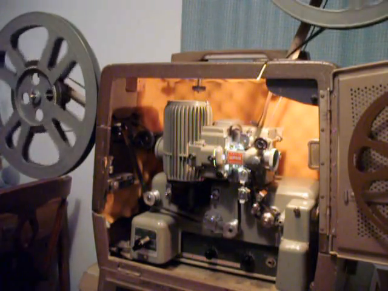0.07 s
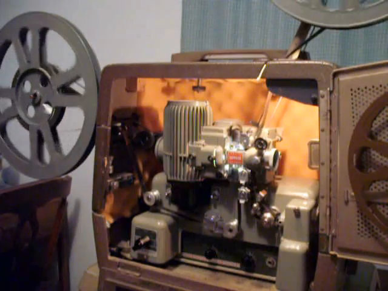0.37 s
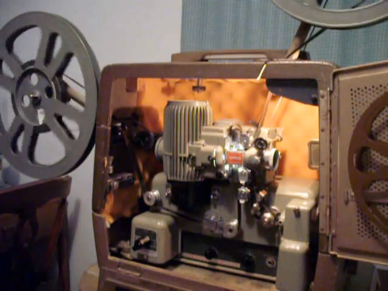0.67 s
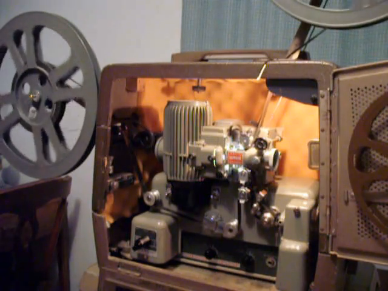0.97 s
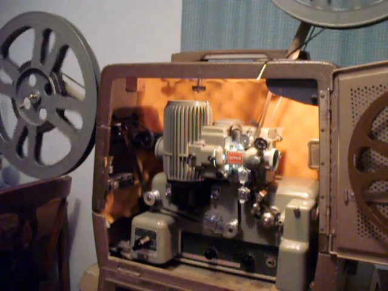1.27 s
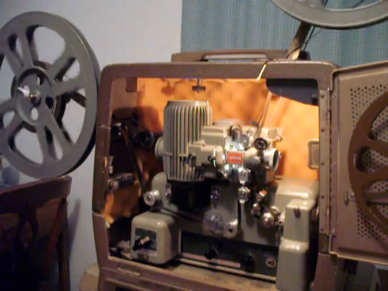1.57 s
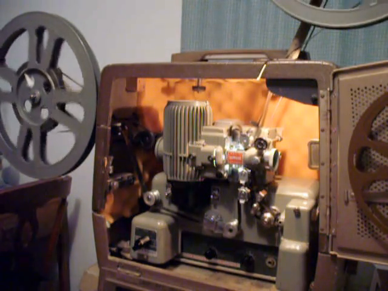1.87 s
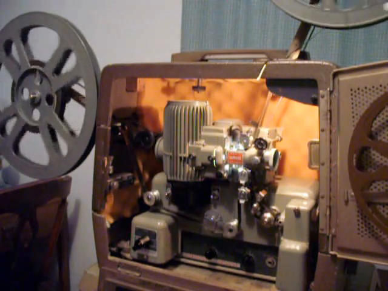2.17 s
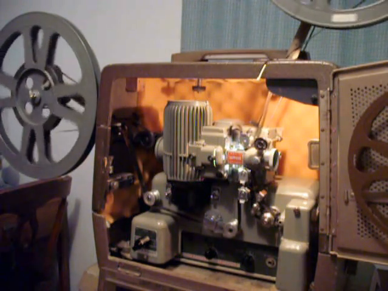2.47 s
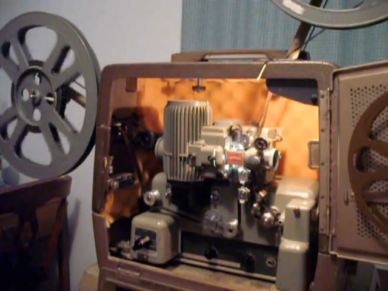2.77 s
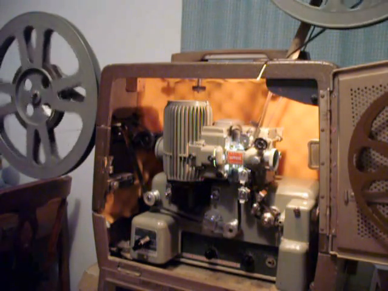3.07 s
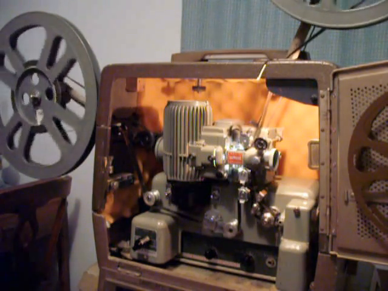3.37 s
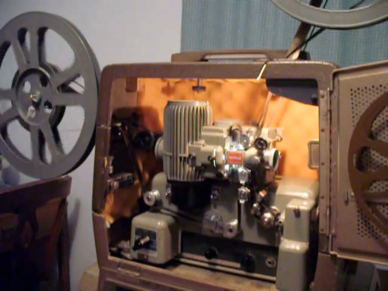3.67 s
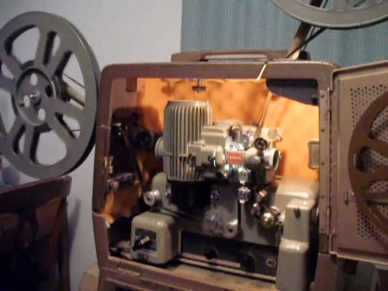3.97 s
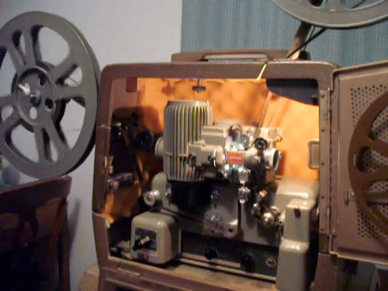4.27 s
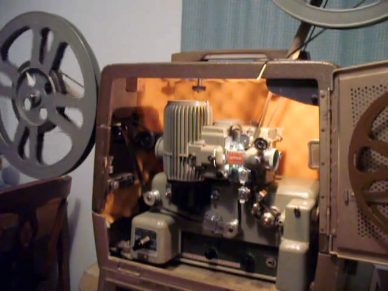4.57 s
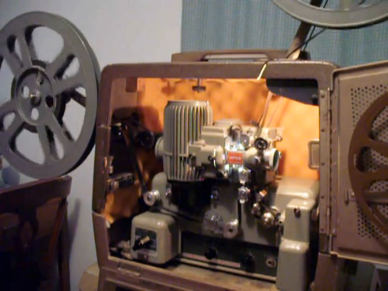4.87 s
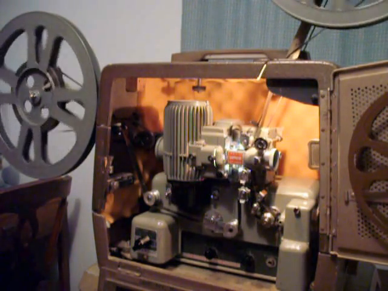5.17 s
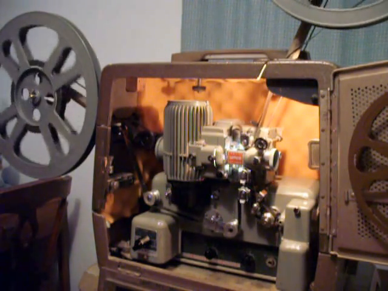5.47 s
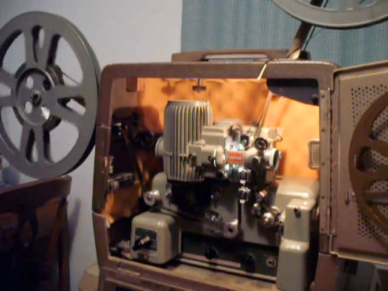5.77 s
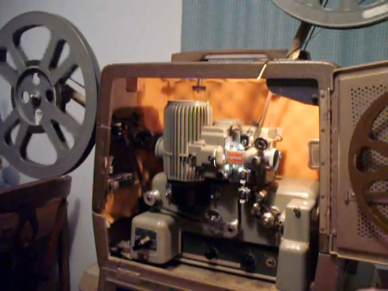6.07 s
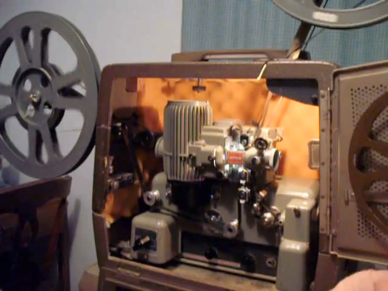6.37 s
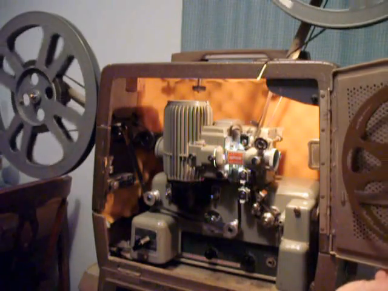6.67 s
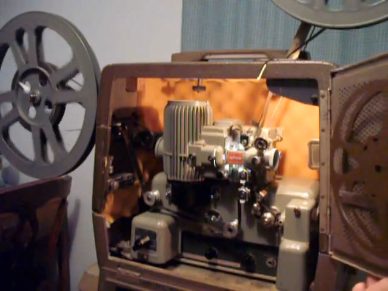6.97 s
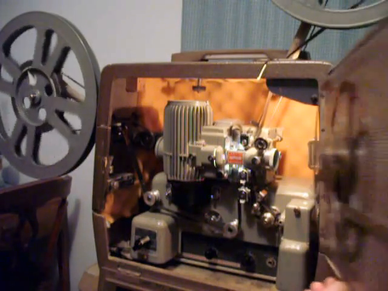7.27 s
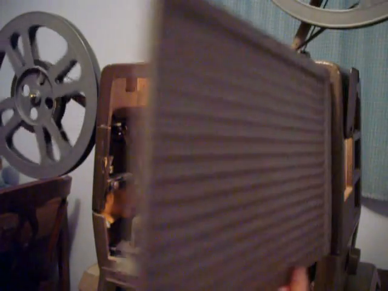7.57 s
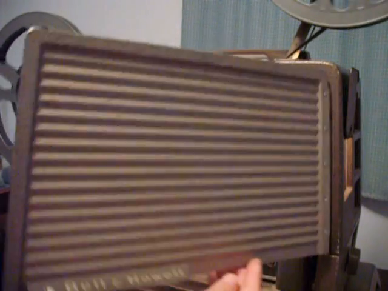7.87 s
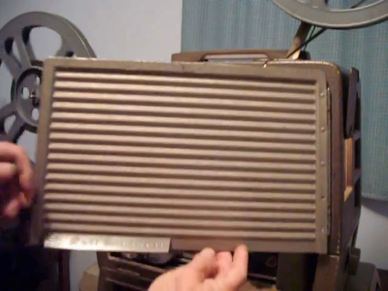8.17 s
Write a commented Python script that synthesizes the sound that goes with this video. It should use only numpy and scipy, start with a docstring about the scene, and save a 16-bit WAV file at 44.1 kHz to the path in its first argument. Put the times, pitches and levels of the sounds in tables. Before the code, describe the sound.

Steady fan rush, gear whine and fine clatter from a film projector, broken by a brief rasping screech and slightly muffled near the end.

```python
"""A small room with a film projector running: its fan rushes, motor and gears whine, and teeth, claw
and film rattle in the case; the whine changes colour as the load shifts. Something in the film path
binds and gives a loud, rasping squeal that drives the recorder into its limiter. A few dull bumps
follow. Near the end the side door swings shut, first throwing the noise forward, then screening
its treble."""
import sys
import numpy as np
from scipy import signal
from scipy.fft import rfft, irfft, next_fast_len
from scipy.io import wavfile

SR = 44100
rng = np.random.default_rng(int(sys.argv[2]) if len(sys.argv) > 2 else 0)


def generate_wav(signal):
    """Clip the signal to [-1, 1] and save it as 16-bit WAV at the path in sys.argv[1]."""
    frames = np.transpose(np.atleast_2d(signal))
    scaled = np.clip(frames, -1, 1) * 32767
    pcm = np.round(scaled).astype(np.int16)
    wavfile.write(sys.argv[1], SR, pcm)


N = 362943


def from_db(db):
    """Decibels to gain."""
    return np.exp(np.asarray(db) * (np.log(10) / 20))


def rms_one(x):
    """Scale to unit power."""
    return x / np.sqrt(np.mean(x ** 2) + 1e-20)


def near(value, centre, width):
    """Bell curve, 1 at the centre."""
    return np.exp(-((value - centre) / width) ** 2)


def past(angle, edge, softness):
    """0 to 1 as the angle closes past an edge."""
    return 1 / (1 + np.exp((angle - edge) / softness))


def drift(rate_hz):
    """Smooth random wander, rms about 1."""
    pole = np.exp(-40 * np.pi * rate_hz / SR)  # runs at SR / 20
    slow = signal.lfilter([1], [1, -2 * pole, pole * pole], rng.standard_normal(N // 20 + 4002))[4000:]
    return np.interp(np.arange(N) / 20, np.arange(len(slow)), rms_one(slow))


def resonance(x, hz, q):
    """Band picked out by one mode."""
    return signal.lfilter(*signal.iirpeak(hz, q, fs=SR), x)


def treble(x, hz):
    """Zero-phase high-pass."""
    return signal.sosfiltfilt(signal.butter(3, hz, "high", fs=SR, output="sos"), x)


def coloured(x, spectrum, resonances=()):
    """Broad colour plus resonant peaks and dips; rms 1."""
    size = next_fast_len(N)
    hz = np.maximum(np.arange(size // 2 + 1) * SR / size, 1)
    points_hz, levels_db = np.transpose(spectrum)
    db = np.interp(np.log(hz), np.log(points_hz), levels_db)
    for centre_hz, width_hz, lift_db in resonances:
        db = db + lift_db / (1 + (2 * (hz - centre_hz) / width_hz) ** 2)
    return rms_one(irfft(rfft(x, size) * from_db(db), size)[:N])


def shaft(hz, wow):
    """Turns made by a shaft whose speed wanders."""
    return np.cumsum(hz * (1 + wow * drift(1.5))) / SR


def rattle(turns, spread_db, per_turn):
    """Teeth and claw touch at the same places every turn, with slightly varying force."""
    places, force = rng.random(per_turn), rng.standard_normal(per_turn)
    contact_turns = np.arange(int(turns[-1]) + 1)[:, None] + places
    contact_samples = np.searchsorted(turns, contact_turns).ravel()
    sizes = force * from_db(spread_db * rng.standard_normal(contact_turns.shape))
    return rms_one(np.bincount(contact_samples, sizes.ravel(), N + 1)[:N])


def whine(turns, orders, waver_db, waver_hz):
    """Whole harmonics of a shaft; each wavers and changes level as the load shifts."""
    shift_mid_s, shift_length_s = 3.8, .4
    shifted = np.clip((np.arange(N) / SR - shift_mid_s) / shift_length_s + .5, 0, 1)
    out = np.zeros(N)
    for order, before_db, after_db in orders:
        db = before_db + (after_db - before_db) * shifted + waver_db * drift(waver_hz)
        out += np.sqrt(2) * from_db(db) * np.sin(2 * np.pi * (round(order) * turns + rng.random()))
    return out


def projector():
    """Fan air and rattle throb with the strokes and ring in the case; gears, rotor and mains add tones."""
    # throbbing parts (3 per turn is the frame rate): strokes_per_turn, depth
    strokes = [(3, .02), (6, .02), (7, .035), (12, .018), (15, .018)]
    # colour of air and rattle: freq_hz, level_db
    rush_spectrum = [(25, -12.5), (65, -36), (100, -24), (130, -19.5), (260, -16.5), (330, -9.5),
                     (420, -11.5), (800, -7.5), (1100, -6.5), (1350, -4.5), (1850, -5.5), (2200, -1),
                     (3200, -1.5), (4500, -5.5), (5330, -8), (5550, -18), (5750, -22.5), (6200, -55.5)]
    # case and film path resonances: centre_hz, width_hz, lift_db
    case_modes = [(476.7, 60, 9.5), (943, 35, 3), (1310, 85, 3.5), (1586, 100, 5), (1920, 45, -1.5),
                  (2386, 23, 5.5), (2590, 63, -2), (3230, 55, -2), (3500, 70, 3), (3768, 250, 6.5),
                  (4545, 120, -4.5)]
    # thin rings of small metal parts: centre_hz, width_hz, lift_db
    metal_rings = [(2732, 20, 4.5), (2860, 10, 4), (4845, 50, 6.5), (5217, 18, 7)]
    # gear train tones around the load shift: shaft_order, before_db, after_db
    gear_orders = [(9, -68, -70.5), (24, -65, -63), (26, -67.5, -62), (27, -55.5, -56.5), (33, -71, -68),
                   (38, -68, -69.5), (40, -58, -61), (45, -53.5, -52.5), (48, -59, -62.5), (59, -56.5, -58),
                   (72.44, -54.5, -59), (80.8, -49, -55), (117, -49, -59), (127.2, -52, -56),
                   (147.8, -60, -53), (153.1, -53, -49), (159.7, -52, -50), (163.6, -49, -58),
                   (171.1, -47, -48), (181, -54, -52), (190.7, -52.5, -48), (196.4, -55.5, -53),
                   (200.4, -50, -50), (204.6, -50, -55)]
    # motor and fan tones: rotor_order, before_db, after_db
    motor_orders = [(1, -56.5, -56), (6, -49.5, -53.5), (7, -58, -58), (8, -58.5, -55), (9, -52, -54.5),
                    (11, -53, -58), (13, -51.5, -54), (15, -57.5, -55)]
    gear_hz, rotor_hz, mains_hz = 7.944, 86.95, 60
    gear, rotor = shaft(gear_hz, wow=.0013), shaft(rotor_hz, wow=.001104)
    throb = 1 + sum(depth * np.cos(2 * np.pi * (count * gear + rng.random())) for count, depth in strokes)
    air = rng.standard_normal(N)
    fine_rattle = from_db(-7.5) * rattle(gear, spread_db=1, per_turn=700)
    clatter = from_db(-12.5) * rattle(gear, spread_db=.7, per_turn=24)
    excitation = (air + fine_rattle + clatter) * throb * from_db(.083 * drift(1.2))
    rush = from_db(-26) * coloured(excitation, rush_spectrum, case_modes + metal_rings)
    gear_tones = whine(gear, gear_orders, waver_db=2.5, waver_hz=2)
    rotor_tones = whine(rotor, motor_orders[1:], waver_db=1.5, waver_hz=.94)
    imbalance = whine(rotor, motor_orders[:1], waver_db=.5, waver_hz=2)
    hum = from_db(-60) * np.sin(2 * np.pi * 2 * mains_hz * np.arange(N) / SR)
    return rush + gear_tones + rotor_tones + imbalance + hum


def friction():
    """Each rub bites, holds and lets go; the strongest sets roughness and pitch."""
    # film path rubs: start_s, length_s, attack_s, level_db, rough_start, rough_end, pitch_hz
    rubs = [(0.898, 0.16, .06, -35, 0.93, 0.92, 2300), (2.488, .014, .002, -25.5, .45, .45, 2330),
            (2.502, .012, .0015, -13, .36, .6, 2330), (2.521, .014, .005, -11, .4, .58, 2325),
            (2.539, .012, .002, -14, .55, .7, 2240), (2.555, .009, .002, -15.2, .7, .7, 2230),
            (2.57, .006, .003, -13.3, .6, .7, 2310), (2.581, .005, .002, -13.6, .65, .7, 2300),
            (2.591, .016, .002, -13, .72, .7, 2250), (2.622, .05, .014, -13.4, .86, .86, 2260),
            (2.673, .024, .003, -10.4, .66, .86, 2340), (2.708, .022, .004, -10.6, .66, .76, 2300),
            (2.735, .02, .002, -12.4, .62, .55, 2330), (2.777, .1, .02, -29.5, .75, .75, 2480),
            (2.955, 0.087, 0.028, -31.5, 0.8, .85, 2330)]
    bite_db, bite_s, break_up_s, release_db_per_s = 3.5, .014, .049, 385
    strength, rough, pitch_hz = np.zeros((3, N))
    for start_s, length_s, attack_s, level_db, rough_start, rough_end, hz in rubs:
        age_s = np.clip(np.arange(N) / SR - start_s, 0, 1)
        held_db = level_db + bite_db * np.exp(-age_s / bite_s)
        fall_db = release_db_per_s * np.maximum(age_s - length_s, 0)
        grip = np.minimum(age_s / attack_s, 1) * from_db(held_db - fall_db)
        leads = grip > strength
        rough = np.where(leads, np.interp(age_s, [0, break_up_s], [rough_start, rough_end]), rough)
        pitch_hz = np.where(leads, hz, pitch_hz)
        strength = np.maximum(strength, grip)
    return strength, np.clip(rough, 0, 1), pitch_hz


def squeal():
    """Stick-slip: roughness trades a clean tone for a rasp; narrow pitches ring on in the room."""
    # colour of the rasp: freq_hz, level_db
    rasp_spectrum = [(60, -50), (150, -36), (500, -23.5), (1000, -16.5), (1350, -9.5), (1750, -5),
                     (2000, -3.5), (2200, -5.5), (2480, -4), (2700, -8.5), (3100, -12.5), (3850, -10.5),
                     (4400, -23), (5400, -41.5)]
    # narrow pitches that ring on briefly in the room after the rasp: pitch_hz, gain_db
    room_rings = [(1728, 7), (2105, 8), (2223, 9), (2321, 6), (2486, 11.5)]
    strength, rough, held_hz = friction()
    pitch_hz = held_hz * (1 - .012 * rough + .04 * rough * drift(137))
    tone = np.sqrt(2) * np.sin(2 * np.pi * np.cumsum(pitch_hz) / SR)
    tone *= from_db(1.4 * rough * drift(120)) * strength * np.sqrt(1 - rough ** 2)
    scrape = rng.standard_normal(N) * from_db(drift(120))
    rasp = strength * rough * from_db(-1.44) * coloured(scrape, rasp_spectrum)
    ringing = sum(from_db(db) * resonance(rasp, hz, q=480) for hz, db in room_rings)
    reverb = room(from_db(-11) * tone + from_db(-.2) * rasp, t60_s=.63)
    return tone + rasp + ringing + reverb


def room(x, t60_s):
    """Dense decaying reflections after the nearest wall's delay; unit power gain."""
    t = np.arange(int(.8 * SR)) / SR
    tail = rng.standard_normal(len(t)) * from_db(-60 * t / t60_s) * (t > .006)
    return signal.fftconvolve(x, tail / np.linalg.norm(tail))[:N]


def bumps():
    """Each row rings one damped mode; the first three rows together are a single knock that rings three modes."""
    # bumps on case and microphone: start_s, peak_db, pitch_hz, t60_s
    hits = [(3.018, -29.5, 359, 0.13), (3.025, -36.5, 287, 0.24), (3.031, -37.5, 170, 0.12),
            (3.79, -47, 150, .15), (5.79, -36, 24.2, 0.5), (7.976, -33, 460, 0.12), (8.155, -27, 1560, .08)]
    out = np.zeros(N)
    for start_s, peak_db, pitch_hz, t60_s in hits:
        age_s = np.clip(np.arange(N) / SR - start_s, 0, 2)
        out += from_db(peak_db - 60 * age_s / t60_s) * np.sin(2 * np.pi * pitch_hz * age_s)
    return out


def swells(x):
    """Narrow bands of the running noise rise or recede for a while."""
    # slow colour shifts: peak_s, spread_s, centre_hz, q, lift_db
    bands = [(4.95, .3, 590, 14, 5), (5.4, 0.44, 680, 14, 5.5), (5.3, 0.41, 455, 8, -6),
             (5.85, .3, 330, 8, 4.5), (6.9, 1, 660, 11, -3), (6.55, .7, 4870, 45, 3)]
    t = np.arange(N) / SR
    for peak_s, spread_s, centre_hz, q, lift_db in bands:
        x = x + (from_db(lift_db * near(t, peak_s, spread_s)) - 1) * resonance(x, centre_hz, q)
    return x


def door(x):
    """The closing door passes its resonances, mirrors the noise, shades the treble and nearly seals."""
    # side door opening: time_s, angle_deg
    swing = [(6.1, 170), (6.4, 170), (6.75, 147), (7.0, 140), (7.25, 105.6), (7.5, 94), (7.75, 49),
             (8.0, 18), (8.23, 12)]
    # panel and gap resonances: freq_hz, q, centre_deg, spread_deg, lift_db
    modes = [(87, 7.6, 120, 56, 2), (1000, 9, 122, 20, 4), (1430, 3.5, 136, 30, 1.8),
             (1570, 7, 82, 12, 4.5), (1760, 20, 114, 14, 4.5), (2380, 18, 130, 10, 0.5),
             (2600, 3, 90, 9, -1), (4100, 14, 117, 8, 1.5), (4500, 30, 130, 15, 3.5)]
    angle_deg = np.interp(np.arange(N) / SR, *np.transpose(swing))
    for hz, q, centre_deg, spread_deg, lift_db in modes:
        x = x + (from_db(lift_db * near(angle_deg, centre_deg, spread_deg)) - 1) * resonance(x, hz, q)
    mirror_db = 1.7 * near(angle_deg, centre=116, width=12)  # inner face reflects at the microphone
    shade_db = -2.9 * past(angle_deg, edge=98, softness=2.5)  # panel hides the mechanism
    seal_db = -2 * past(angle_deg, edge=48, softness=8.3)  # narrow gap holds in the mids too
    x = x + (from_db(mirror_db + seal_db) - 1) * treble(x, hz=760)
    return x + (from_db(shade_db) - 1) * treble(x, hz=1700)


def scene():
    """One microphone in front of the case, the same in both channels."""
    return np.tile(door(swells(projector())) + squeal() + bumps(), (2, 1))


def limiter(x, ceiling, recover_db_per_s):
    """Gain ducks instantly under peaks above the ceiling, then recovers."""
    over_db = 20 * np.log10(np.maximum(np.abs(x) / ceiling, 1))
    recovered_db = recover_db_per_s * np.arange(N) / SR
    return x * from_db(recovered_db - np.maximum.accumulate(over_db + recovered_db, axis=-1))


def record(dry):
    """Narrow-band recorder whose abrupt limiter crackles on the loudest peaks."""
    recorder_stop_hz, output_stop_hz = 6000, 16600
    narrow = signal.sosfilt(signal.cheby2(26, 70, recorder_stop_hz, fs=SR, output="sos"), dry)
    limited = limiter(narrow, ceiling=.71, recover_db_per_s=420)
    return signal.sosfilt(signal.cheby2(12, 70, output_stop_hz, fs=SR, output="sos"), limited)


dry = scene()
out = record(dry)
generate_wav(out)
```